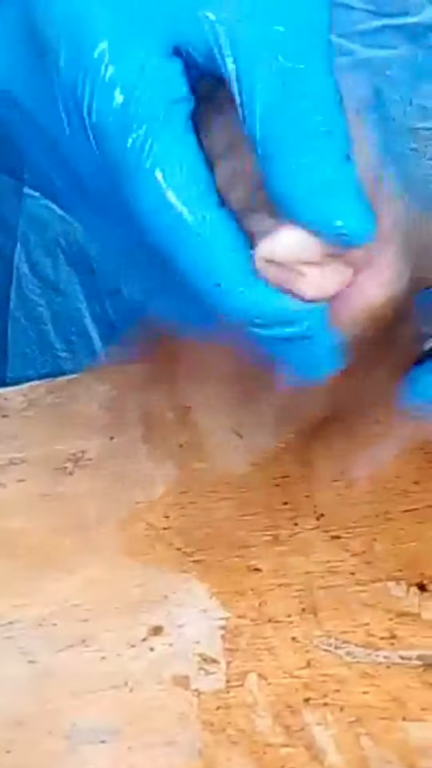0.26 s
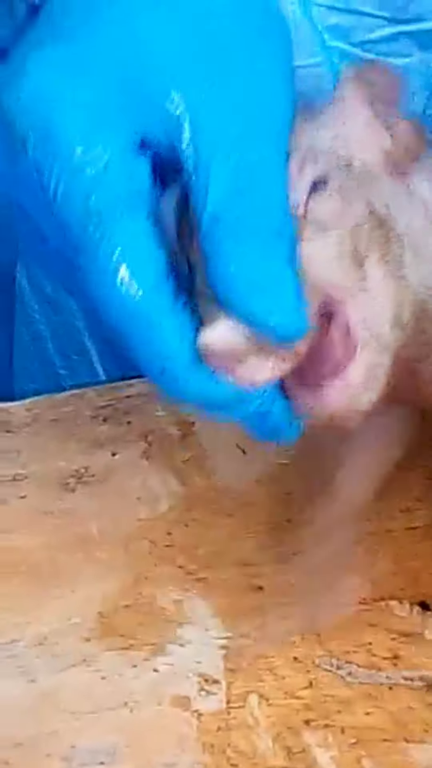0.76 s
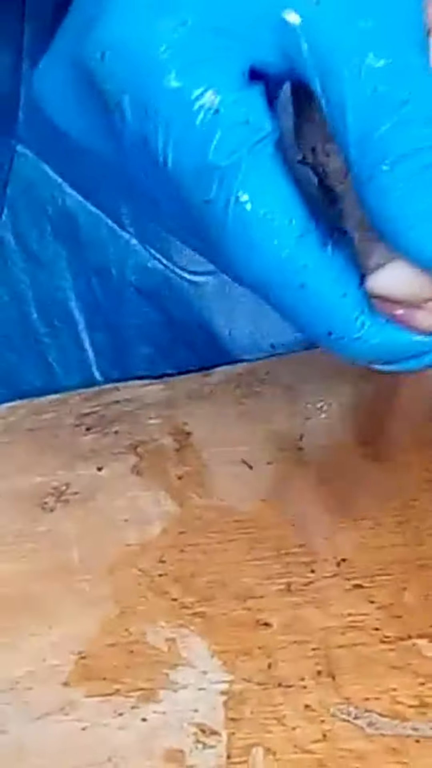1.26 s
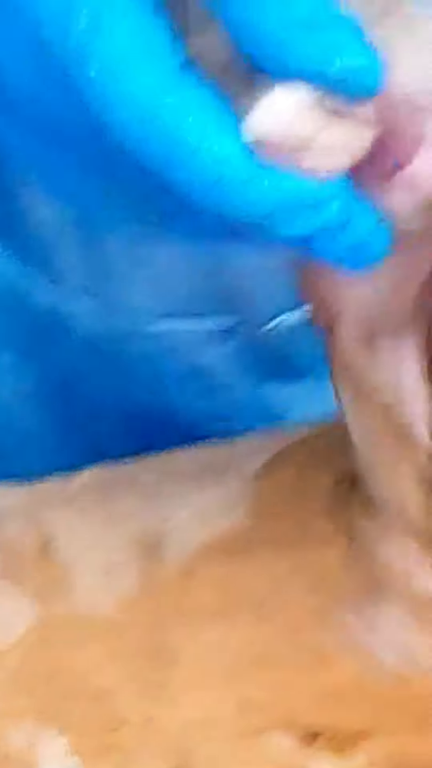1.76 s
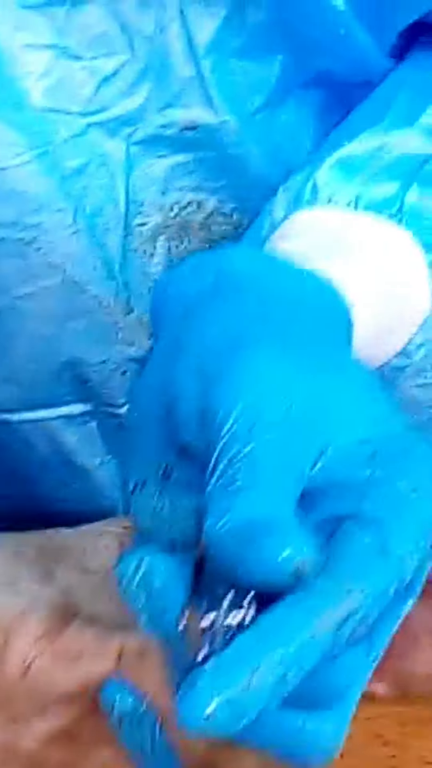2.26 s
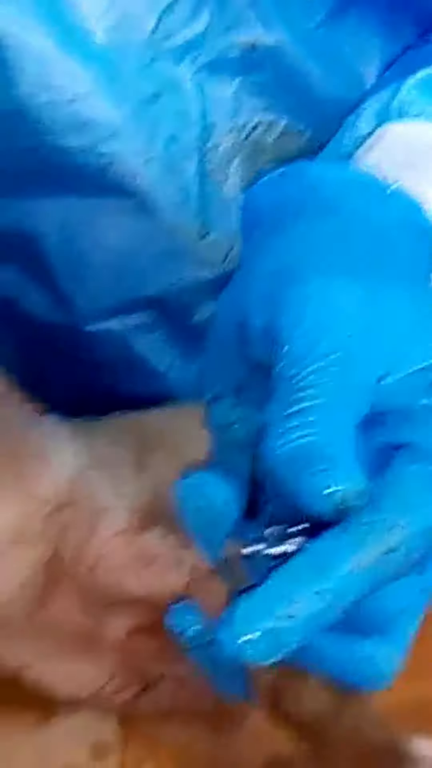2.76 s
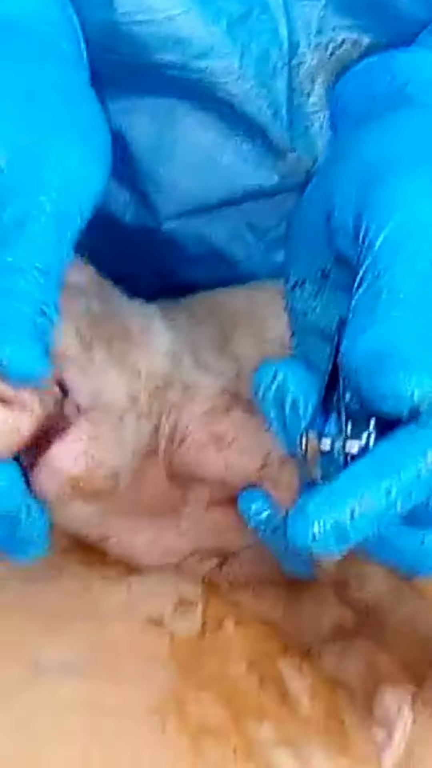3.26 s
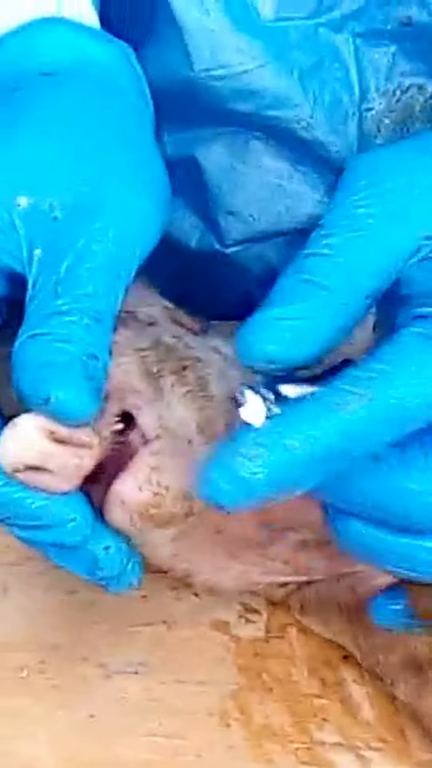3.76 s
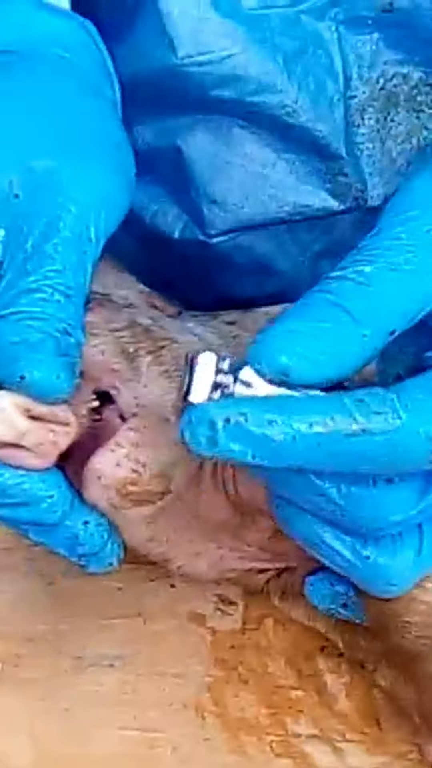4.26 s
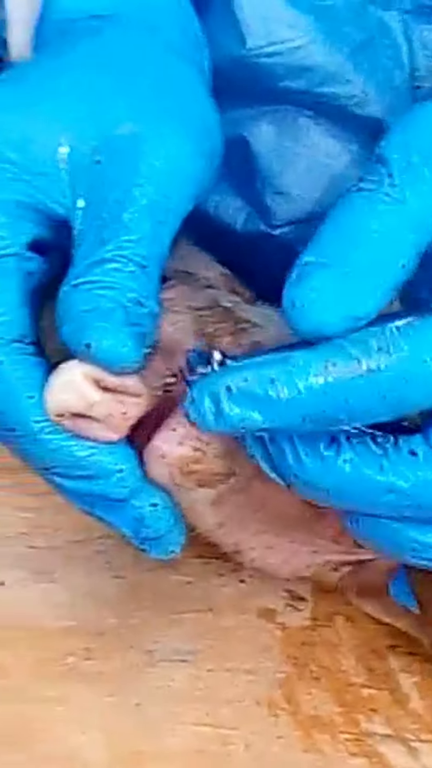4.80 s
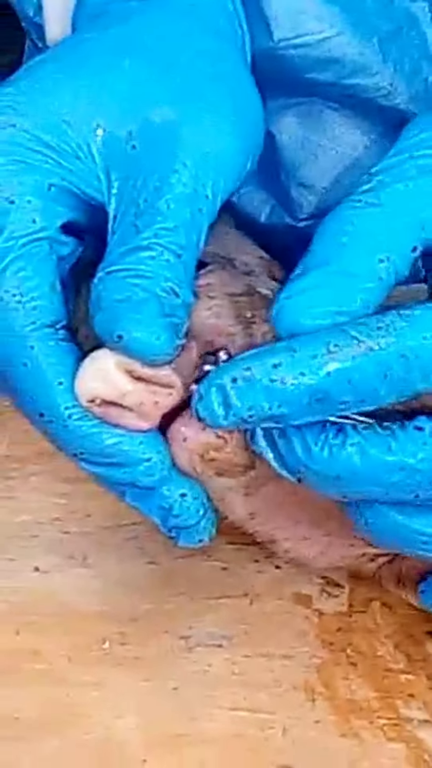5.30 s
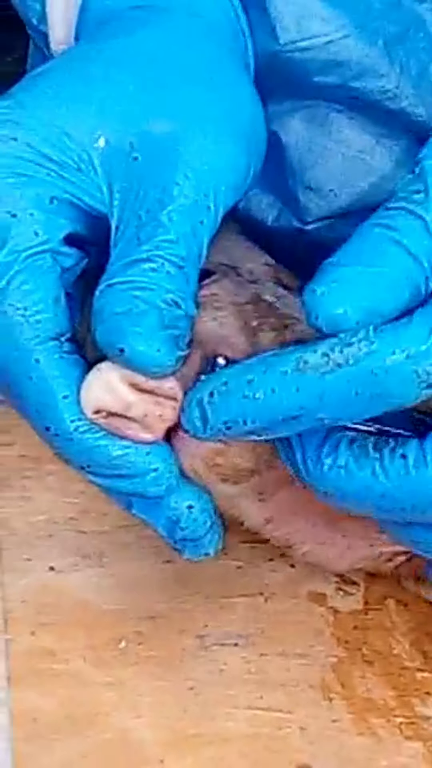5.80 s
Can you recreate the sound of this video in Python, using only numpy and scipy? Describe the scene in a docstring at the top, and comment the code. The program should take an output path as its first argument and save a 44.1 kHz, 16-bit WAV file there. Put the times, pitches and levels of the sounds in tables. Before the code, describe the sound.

The fading ring of an earlier squeal and a cloth rustle lead to a wooden hoof knock, then a run of quick, harsh piglet cries, rough and piercing. The cries grow louder and steadier, one long and buzzing. After a clipped weak one come scuffs, hoof taps and glove ticks on the table, then two drawn-out shrill squeals. Close phone pickup, squeezed in loudness, in an echoing barn with a wavering hum.

```python
"""A newborn piglet, held on a wooden table in a farm building, squeals close to a phone's microphone.
Its vocal folds whistle, mostly at 2-4 kHz, while a slower flap of tissue chops the breath into a rasp or a buzz.
On the table hooves knock and scrape as noise through board resonances; gloves and gown rustle as grainy noise.
Farther off the shed hums as flickering noise bands, and its echo and an earlier squeal die away.
The phone turns its gain down in each cry, and more so in the bass."""
import sys
import numpy as np
from scipy import signal
from scipy.fft import rfft, irfft
from scipy.io import wavfile
from scipy.ndimage import uniform_filter1d

SR = 44100
rng = np.random.default_rng(int(sys.argv[2]) if len(sys.argv) > 2 else 0)


def store_pcm(level_fs):
    """Save levels as 16-bit WAV."""
    pcm = np.round(np.clip(level_fs, -1, 1) * 32767).astype(np.int16)
    wavfile.write(sys.argv[1], SR, np.atleast_2d(pcm).T)


N = 266364
TIME = np.arange(N) / SR

# the piglet's cries, one curve each:
# (time [s], pitch before the flap bends it [Hz], effort [dB], second partial against the first [dB])
CRY_CURVES = [
    [(0.288, 3798, -21, 5), (0.33, 3980, -9.5, 14), (0.38, 3480, -3.5, 6.5), (0.42, 3075, -9.5, -0.5),
     (0.445, 3530, -11.5, 12), (0.46, 3020, -12, -0.5), (0.483, 1670, -9, -26)],
    [(0.686, 1750, -21, -7), (0.712, 2295, -13.5, -23), (0.745, 1744, -9.5, -7), (0.787, 1835, -15.5, -44),
     (0.8, 3110, -5, 2.5), (0.818, 3690, -2, 4.5), (0.845, 4005, -10.5, 4.5), (0.866, 3450, -14, 9),
     (0.883, 2265, -2, -35)],
    [(1.052, 2616, 0.5, -16.5), (1.075, 2270, -3, -14), (1.1, 2560, -3, -7.5), (1.18, 2377, -5.5, -7.5),
     (1.2, 3226, -14.5, 9), (1.225, 3803, -11.5, 2), (1.255, 3694, -9.5, 7), (1.279, 2290, -6.5, -17)],
    [(1.463, 2036, -16.5, -4), (1.48, 1945, -11, -8), (1.495, 2300, -3.5, -21.5), (1.54, 2395, -1.5, -9.5),
     (1.59, 3343, -10.5, 5), (1.61, 3404, -6, 9.5), (1.65, 3872, 1, 6), (1.68, 3511, -4.5, 7.5),
     (1.7, 1941, -17.5, -13)],
    [(2.06, 2692, 2, -23.5), (2.1, 2184, -8.5, -4), (2.19, 2507, -1.5, -15.5), (2.24, 2106, -3.5, -7),
     (2.285, 2692, -3, -23), (2.31, 2955, 5, -9), (2.33, 2480, 8, -18), (2.347, 1818, -7, -9.5)],
    [(2.642, 1880, -16, 5.5), (2.662, 1765, -10, -11), (2.685, 1750, -19, -9.5), (2.705, 2250, -7.5, -7.5),
     (2.74, 2300, -5, -8.5), (2.78, 1916, -6, -4), (2.82, 1774, -20, 3.5), (2.87, 1768, -49, -18)],
    [(3.102, 2064, -23.5, 2), (3.13, 1787, -25.5, -7), (3.14, 2325, -14, -7), (3.175, 3070, 9.5, -28),
     (3.23, 3250, 2, -11.5), (3.27, 3843, 2.5, -6.5), (3.31, 3770, -3.5, 2.5), (3.325, 2737, -10, -0.5),
     (3.342, 1878, -29, -10)],
    [(3.592, 3011, 4, -13.5), (3.628, 3048, 6.5, -20.5), (3.64, 3250, -2, -21), (3.68, 4047, 2.5, -19),
     (3.75, 4116, 1.5, 0.5), (3.86, 4230, -2, 0.5), (3.935, 3987, -0.5, -3), (3.965, 3235, -7, 0.5),
     (3.98, 1976, -11, -17), (4.0, 1189, -38, 9)],
    [(4.267, 2168, -12.5, -12.5), (4.3, 1750, -14, 2), (4.33, 1609, -11, -5.5), (4.348, 1200, -15, -4.5)],
    [(4.76, 1808, -21.5, 0.5), (4.79, 1702, -19.5, 7.5), (4.81, 2419, -7.5, -42), (4.83, 2545, 0, -16),
     (4.855, 3337, 3.5, -61), (4.9, 3780, -1.5, -51), (4.96, 3842, -1, -55), (5.05, 4077, -2, -5.5),
     (5.19, 3977, -3, 1), (5.29, 4050, -6, 3.5), (5.32, 3212, -11, -14), (5.347, 1200, -17.5, -1)],
    [(5.593, 2415, -19, -15), (5.62, 1815, -27, -8), (5.66, 2640, -34, -34), (5.7, 3660, -26, -29),
     (5.75, 3887, -10, -29), (5.82, 4030, 4, -15), (5.9, 3860, 0.5, -5.5), (5.99, 3940, 1, -7),
     (6.015, 3644, -9, -6.5), (6.038, 2210, -15.5, -22)],
]

ROOM_T60_S, ROOM_DB, ROOM_GAP_S = 0.47, -24, 0.0088  # decay time, echo level, wait before the echo
ROOM_FADE = np.exp(-np.log(1000) * TIME / ROOM_T60_S)


def undb(db):
    """Amplitude factor of a level in dB."""
    return 10 ** (np.asarray(db) / 20)


def unit(x):
    """Scale to an RMS of 1."""
    return x / np.sqrt(np.mean(x ** 2))


def band(x, hz, width):
    """Resonance of gain 1 at its centre."""
    return signal.lfilter(*signal.iirpeak(hz, hz / width, SR), x)


def body(x, modes):
    """Neighbouring resonances ring in opposite sign."""
    return sum((-1) ** k * undb(db) * band(x, hz, width) for k, (hz, width, db) in enumerate(modes))


def colour(x, points):
    """Filter through (frequency [Hz], gain [dB]) points."""
    hz, db = np.transpose(points)
    bins_hz = np.fft.rfftfreq(N, 1 / SR)
    gain = undb(np.interp(np.log(bins_hz + 1), np.log(hz), db))
    return irfft(rfft(x) * gain, N)


def walk(rate):
    """Random levels held 1 / rate s and slewed; spread 1."""
    k = int(SR / rate)
    steps = np.repeat(rng.standard_normal(N // k + 1), k)
    return unit(uniform_filter1d(steps, k)[:N])


def sounding(tables, rise_s, fall_s):
    """A window that is open within each table, and the joined columns of all tables."""
    s, *columns = np.concatenate(tables).T
    window = 0
    for rows in tables:
        start, end = rows[0][0], rows[-1][0]
        window = window + np.interp(TIME, [start - rise_s, start, end, end + fall_s], [0, 1, 1, 0])
    return window, [np.interp(TIME, s, c) for c in columns]


def strokes(rows, rise_s, rise_db):
    """A stroke swells to its level and fades until it ends."""
    return [[(s, db + rise_db, *rest), (s + rise_s, db, *rest), (s + length, db + fade, *rest)]
            for s, length, db, fade, *rest in rows]


def shed():
    """Fans and distant animals blend into a noise floor whose third-octave bands flicker."""
    # spectrum of the floor: (frequency [Hz], relative density [dB per Hz])
    floor_points = [(18, -71), (30, -39), (112, -6.5), (306, -1), (480, -7.5), (593, -8.5), (1490, -6),
                    (2050, -0.5), (2470, -3.5), (10500, -17.5), (13000, -30), (14800, -1), (16500, -38)]
    floor_db = -44
    hz, db = np.transpose(floor_points)
    centres = 40 * 2 ** np.arange(0, 8.7, 1 / 3)
    # a band gathers more power the wider it is
    levels = np.interp(np.log(centres), np.log(hz), db) + 10 * np.log10(centres)
    floor = 0
    for centre, level in zip(centres, levels):
        noise = rng.standard_normal(N)
        narrow = band(band(noise, centre, centre / 3), centre, centre / 3)
        floor = floor + undb(level + 5.64 * walk(6.7)) * unit(narrow)
    return undb(floor_db) * unit(floor)


def earlier_cry():
    """A squeal from just before still rings in the shed: band noise that dies away at the room's rate."""
    # what is left of it: (centre [Hz], width [Hz], level at the start [dB])
    ringing = (4290, 590, -28)
    hz, width, db = ringing
    noise = rng.standard_normal(N)
    return undb(db) * ROOM_FADE * unit(band(band(noise, hz, width), hz, width))


def shed_echo(near):
    """The shed's walls return the near sounds as a dense tail of decaying noise."""
    tail = rng.standard_normal(SR) * ROOM_FADE[:SR] * (TIME[:SR] > ROOM_GAP_S)
    return undb(ROOM_DB) * signal.fftconvolve(near, tail / np.linalg.norm(tail))[:N]


def cloth():
    """Gown and gloves rub in crackly grains of noise through broad resonances, with single ticks."""
    # gown rustle: (start [s], length [s], level [dB], change by its end [dB])
    rustles = [(0.02, 0.24, -34.5, -10.5), (2.82, 0.1, -28.5, -42), (3.385, 0.23, -41.5, -46),
               (4.16, 0.082, -38, -10), (4.35, 0.13, -33.5, -3.5), (4.55, 0.04, -34, -14)]
    # resonances of the cloth: (centre [Hz], width [Hz], gain [dB])
    cloth_modes = [(1510, 1760, -5), (3030, 1380, 3.5), (5130, 1850, -2), (9100, 990, -5.5)]
    # glove and gown ticks: (time [s], peak [dB], centre [Hz])
    ticks = [(2.8924, -30, 5170), (2.9537, -35, 3540), (2.9987, -28, 5630), (3.3908, -22, 3960),
             (4.2346, -26.5, 6130), (4.388, -17.5, 3810), (4.5285, -32, 6850)]
    rise_s, rise_db = 0.017, -18
    window, (db,) = sounding(strokes(rustles, rise_s, rise_db), 0.0085, 0.067)
    grains = rng.standard_normal(N) * undb(2.9 * walk(280))
    out = window * undb(db) * unit(body(grains, cloth_modes))
    for t, peak_db, hz in ticks:
        burst = rng.standard_normal(400) * np.exp(-TIME[:400] / 0.0033)
        tick = band(burst, hz, 0.3 * hz)
        start = int(t * SR)
        out[start:start + 400] += undb(peak_db) * tick / np.abs(tick).max()
    return out


def table():
    """Stick-slip drags and hoof knocks ring the same boards."""
    # body and hooves dragged over the boards:
    # (start [s], length [s], level [dB], change by its end [dB], deepest mode against the others [dB])
    drags = [(0.0, 0.34, -45.5, -14, 3.5), (0.9, 0.11, -60.5, -3, 18), (1.72, 0.37, -40, -44, -5.5),
             (2.34, 0.32, -50, -8, -7), (2.8, 0.29, -48.5, -17, 5), (4.14, 0.17, -38.5, -5, -2),
             (4.32, 0.23, -33, -26, -17), (4.87, 0.23, -49, -2, 8.5)]
    # resonances of the boards: (centre [Hz], width [Hz], gain [dB])
    board_modes = [(105.6, 29, 2.5), (240, 144, 3.5), (368, 88, 7), (500, 160, 1), (850, 195, 3.5),
                   (1310, 110, 17.5)]
    # hoof knocks: (time [s], peak [dB], hardness [0-1])
    knocks = [(0.148, -42, 1), (0.28, -11, 0.88), (4.174, -29, 1), (4.213, -22.5, 0.36), (4.225, -28, 0.7)]
    rise_s, rise_db = 0.064, -16.5
    window, (db, deep_db) = sounding(strokes(drags, rise_s, rise_db), 0.012, 0.06)
    rub = rng.standard_normal(N) * undb(4.5 * walk(40))
    drag = unit(body(rub, board_modes[1:4])) + undb(deep_db) * unit(body(rub, board_modes[:1]))
    out = window * drag * undb(db)
    age = TIME[:4000]
    for t, peak_db, hard in knocks:
        # a softer contact pushes for longer and wakes fewer high modes
        push = np.exp(-age / (0.03 * (1.05 - np.clip(hard, 0, 1))))
        push = push * (1 + 1.1 * rng.standard_normal(4000))
        click = 0.059 * hard * np.diff(push, prepend=0)
        ring = body(push, board_modes) + click
        start = int(t * SR)
        out[start:start + 4000] += undb(peak_db) * ring / np.abs(ring).max()
    return out


def flap():
    """Rate, depth, breath and roughness of the flap through two stages a cry, then letting go."""
    # the flap's first and second stage in each cry, one row a cry:
    # many rasp and then buzz, some rasp throughout, one starts almost clean
    # (first takes hold in [s], time of change [s], second takes hold in [s],
    #  first from [Hz], first to [Hz], second from [Hz], second to [Hz], first depth [0-1], second depth [0-1],
    #  first breath [dB], second breath [dB], first roughness [0-1], second roughness [0-1])
    flap_rows = [ (0.0282, 0.36, 0.056, 166, 200, 200, 233, 0.3, 0.3, -17.5, -14.5, 0.61, 0.53),
                 (0.0231, 0.8, 0.039, 95, 380, 230, 290, 0.95, 0.3, -6.5, -13, 0.32, 0.5),
                 (0.025, 1.206, 0.025, 101, 132, 170, 205, 0.75, 0.35, -14, -10.5, 0.47, 0.56),
                 (0.0349, 1.604, 0.048, 80, 121, 200, 216, 0.75, 0.15, -18, -17.5, 0.32, 0.41),
                 (0.06, 2.31, 0.011, 105, 120, 100, 106, 0.65, 0.15, -14, -21, 0.45, 0.21),
                 (0.03505, 2.87, 0.0088, 88, 136.5, 130, 130, 0.85, 0.5, -14, -3, 0.55, 0.47),
                 (0.03, 3.168, 0.06, 65.7, 85, 300, 600, 0.71, 0.45, -15.5, -17, 0.38, 0.36),
                 (0.029, 3.63, 0.057, 520, 710, 530, 520, 0.12, 0.86, -15.5, -12.5, 0.25, 0.26),
                 (0.0303, 4.355, 0.01, 85, 111, 110, 95, 0.78, 0.9, -23, -26, 0.57, 0.6),
                 (0.013, 4.83, 0.12, 63, 107, 480, 530, 0.89, 0.62, -18, -11.5, 0.23, 0.2),
                 (0.011, 5.645, 0.17, 57, 55.5, 480, 516, 0.6, 0.38, -31, -15.5, 0.3, 0.29), ]
    change_s, let_go_s = 0.022, 0.045  # first stage gives way, cry slackens
    loose_start, loose_change, loose_end = 0.1984, 0.257, 0.41  # share of depth left at those moments
    smooth_hold, smooth_end = 0.6, 0.5  # share of roughness: at the start and as the second holds; at the end
    breath_end_db = -3.5  # change of breath as the cry ends
    rows = []
    for cry, row in zip(CRY_CURVES, flap_rows):
        grip, change, hold, hz0, hz1, hz2, hz3, deep0, deep1, db0, db1, rough0, rough1 = row
        start, end = cry[0][0], cry[-1][0]
        times = [start, start + grip / 2, start + grip, change - change_s,
                 change, change + hold, end - let_go_s, end]
        times = np.maximum.accumulate(np.clip(times, start, end))
        rates = [hz0, hz0, hz0, hz1, hz2, hz2, hz3, hz3]
        depths = [deep0 * loose_start, deep0 * loose_start, deep0, deep0,
                  deep1 * loose_change, deep1, deep1, deep1 * loose_end]
        breaths = [db0, db0, db0, db0, db1, db1, db1, db1 + breath_end_db]
        roughs = [rough0 * smooth_hold, rough0 * smooth_hold, rough0, rough0,
                  rough1, rough1 * smooth_hold, rough1, rough1 * smooth_end]
        rows += zip(times, rates, depths, breaths, roughs)
    s, *columns = np.transpose(rows)
    return [np.interp(TIME, s, c) for c in columns]


def flap_turns(flap_hz, rough):
    """Count the flap's turns, its rate unsteady where it is rough."""
    jitter = rough * (.2 * walk(150) + .3 * walk(600))
    turns = np.cumsum(flap_hz * (1 + jitter)) / SR
    # every cry begins with an opening of the flap
    starts = np.array([0] + [int(cry[0][0] * SR) for cry in CRY_CURVES])
    latest = starts[np.searchsorted(starts, np.arange(N), side="right") - 1]
    turns = turns - turns[latest] + 0.108
    return turns.astype(int), turns % 1


def whistle(hz, second_db, bend, chop, leak, rough):
    """The folds' pitch and its overtones; rough folds waver in phase and level."""
    angle = 2 * np.pi * np.cumsum(hz * bend) / SR
    partials_db = [0 * hz, second_db, second_db - 5.5, second_db - 22.0]
    tone = 0
    for k, db in enumerate(partials_db, 1):
        waver = (k - 1) * 0.72 * rough * walk(700)
        gate = chop if k == 1 else leak
        audible = k * hz < 15500
        tone = tone + gate * np.sqrt(2) * undb(db) * np.sin(k * angle + waver) * audible
    return tone * undb(7.85 * rough * walk(900)), angle


def breath_noise(cycle, size, chop, leak, rough, angle):
    """Slaps of the closing flap and turbulent hiss ring the cavities, with a ragged strand of tone."""
    # cavities that the breath rings: (centre [Hz], width [Hz], gain [dB])
    cavities = [(2477, 82, 5), (6470, 220, 4)]
    # the flap slaps shut once a turn; rough breath turns the slaps to hiss
    slaps = (np.diff(cycle, prepend=0) > 0) * size * 4.2
    hiss = 5.5 * rough * leak * rng.standard_normal(N)
    source = (1 - rough) ** 3 * slaps + hiss
    ringing = sum(undb(g) * band(source, f, w) for f, w, g in cavities)
    # a ragged second strand rides 950 Hz above the whistle
    strand = 4.05 * rough * chop * walk(800) * np.sin(angle + 2 * np.pi * 950 * TIME)
    # the slaps also ring a deep cavity
    deep = 6.1 * band(band(slaps, 1340, 400), 1340, 400)
    return 0.68 * source + ringing + strand + deep


def piglet():
    """Whistling folds and turbulent breath, chopped and bent in pitch by the flap, pass throat and mouth."""
    # throat and mouth: (frequency [Hz], gain [dB])
    throat_points = [(700, -84), (1050, -21.5), (1450, -16.5), (1800, -14), (2400, -8), (3300, -9.5),
                     (4400, -0.5), (5200, -3), (5850, -7.5), (6600, -5), (7600, -17.5), (8250, -21.5),
                     (9200, -12.5), (10200, -27.5), (13500, -37.5), (15200, -31.5)]
    rise_s, fall_s = .003, .006
    breath_lag = 0.36  # share of each dB of effort that the breath does not follow
    window, (hz, effort_db, second_db) = sounding(CRY_CURVES, rise_s, fall_s)
    flap_hz, depth, breath_db, rough = flap()
    breath_db = breath_db - breath_lag * effort_db
    depth, rough = np.clip(depth, 0, 1), np.clip(rough, 0, 1)
    cycle, phase = flap_turns(flap_hz, rough)
    # rough turns differ in size
    size = undb(1.8 * rough * rng.standard_normal(N)[cycle])
    # the flap opens faster than it closes; a slow flap stays shut for longer
    sharp = 2 + 100.0 / flap_hz
    opening = np.sin(np.pi * phase ** .45) ** sharp * np.sqrt(1.1 * sharp + 1)
    chop = (1 - depth + depth * opening * size) / np.sqrt(1 + 0.067 * sharp * depth ** 2)
    # overtones and hiss go on through the narrowing gap
    leak = 0.91 * chop + 0.23 * (1 - depth ** 4)
    # more pressure lifts the pitch, so the lines above the whistle are the stronger
    lift = 0.09 * depth * (opening - 1)
    # the pitch sags through each turn, and rough folds wobble
    sag = (0.03 + 7.5 / flap_hz) * depth * (.5 - phase)
    bend = 1 + lift + sag + 0.032 * rough * walk(1100)
    tone, angle = whistle(hz, second_db, bend, chop, leak, rough)
    breath = breath_noise(cycle, size, chop, leak, rough, angle)
    return colour(window * undb(effort_db) * (tone + undb(breath_db) * breath), throat_points)


def scene():
    """Piglet, table and cloth close by, with the shed around them."""
    near = piglet() + table() + cloth()
    return (near + shed_echo(near) + earlier_cry() + shed())[None]


def record(dry):
    """The phone's gain control roughly halves every dB over the knee, then loud peaks round off."""
    knee_db, ratio = -25.5, 1.937
    sense_s, ahead_s = .025, .004
    bass_hz, bass_duck = 990, 0.13  # below this the gain falls further, in dB per dB over the knee
    top_hz = 16300
    # it weighs the last moments and looks a little ahead
    size = int(sense_s * SR)
    power = uniform_filter1d(dry ** 2, size, axis=1, origin=size // 2 - int(ahead_s * SR))
    over_db = np.maximum(10 * np.log10(power + 1e-12) - knee_db, 0)
    held = dry * undb(-over_db * (1 - 1 / ratio))
    bass = signal.sosfilt(signal.butter(2, bass_hz, fs=SR, output="sos"), held)
    held = held - bass * (1 - undb(-bass_duck * over_db))
    # the microphone port rings near the top of its range
    held = held + 2.8 * band(held, 15000, 730)
    top_cut = signal.ellip(10, .2, 80, top_hz, fs=SR, output="sos")
    return signal.sosfilt(top_cut, np.tanh(held))


dry = scene()
out = record(dry)
store_pcm(out)
```